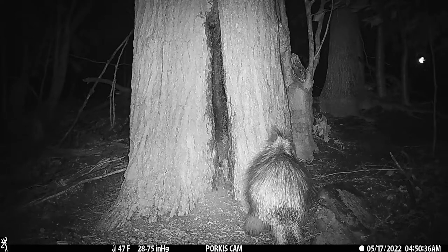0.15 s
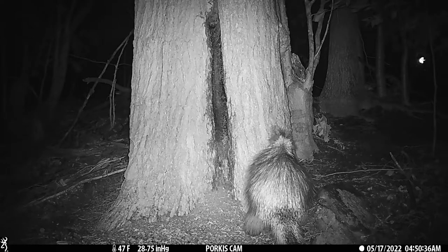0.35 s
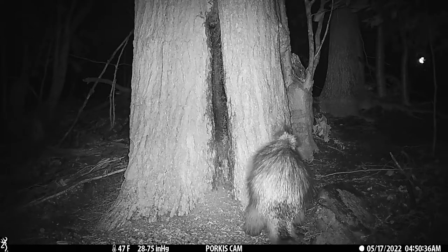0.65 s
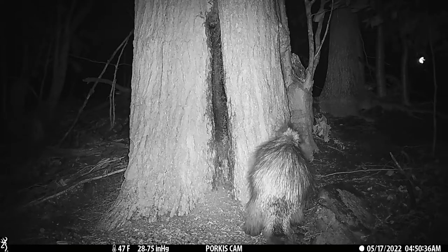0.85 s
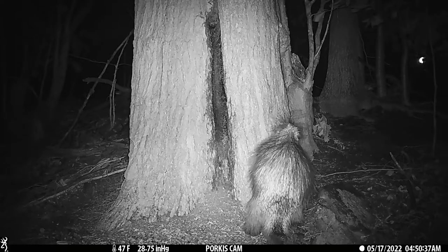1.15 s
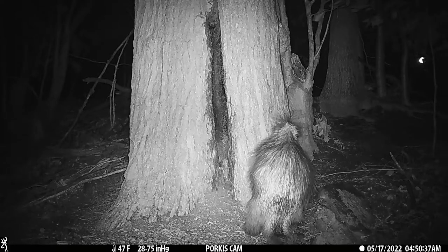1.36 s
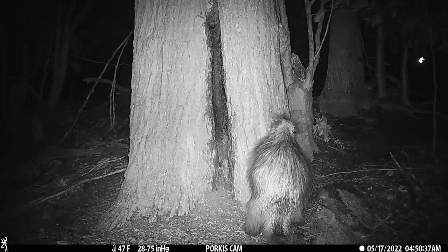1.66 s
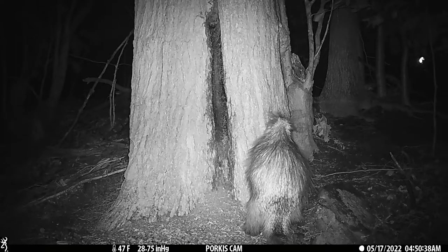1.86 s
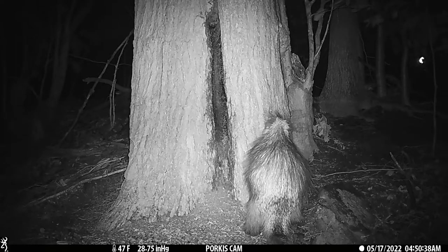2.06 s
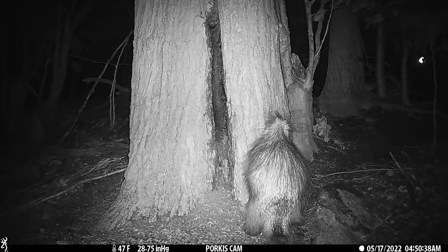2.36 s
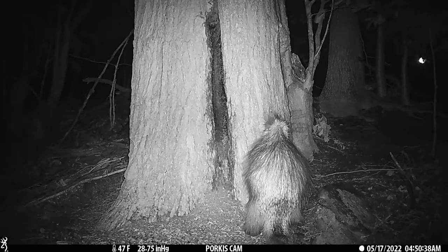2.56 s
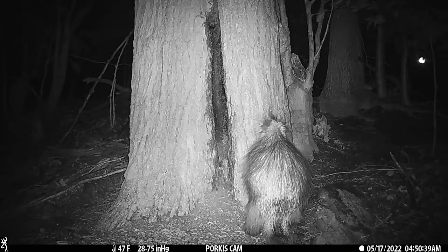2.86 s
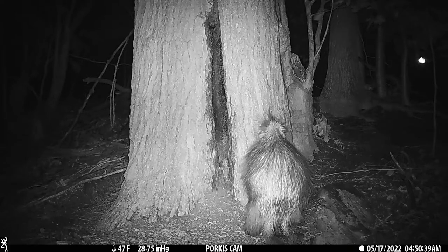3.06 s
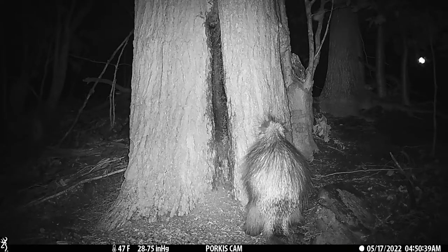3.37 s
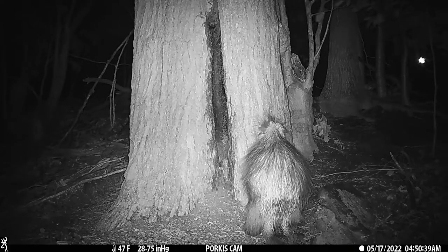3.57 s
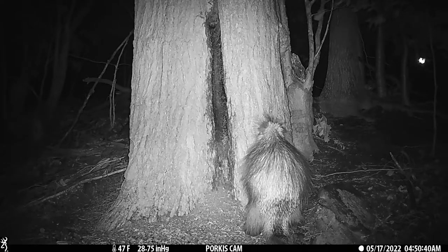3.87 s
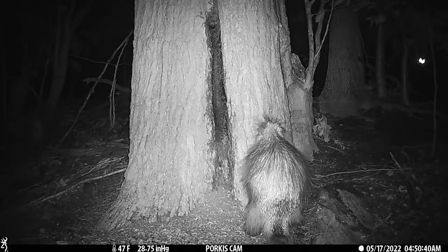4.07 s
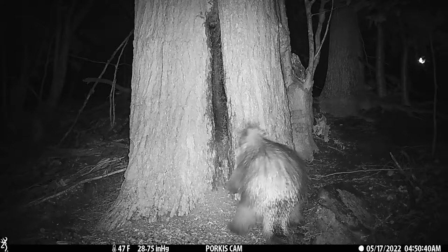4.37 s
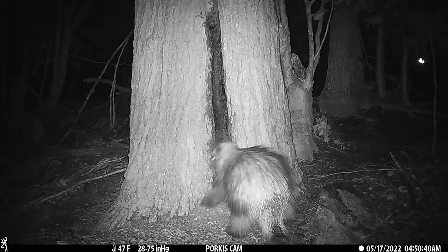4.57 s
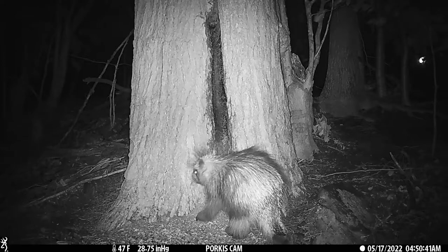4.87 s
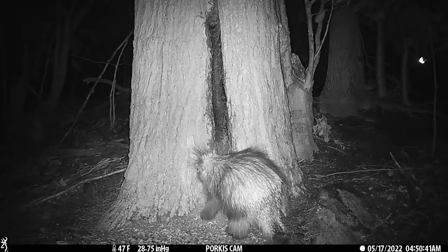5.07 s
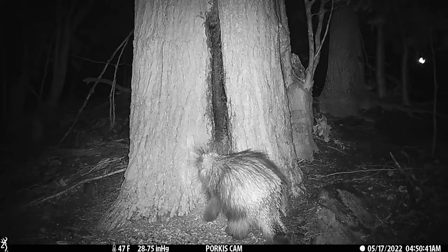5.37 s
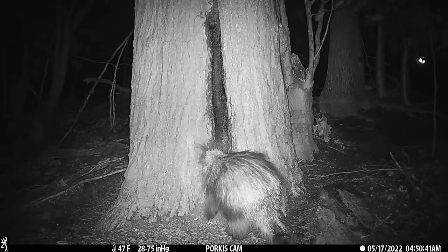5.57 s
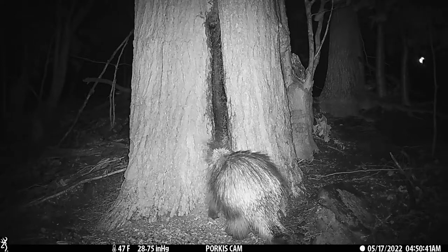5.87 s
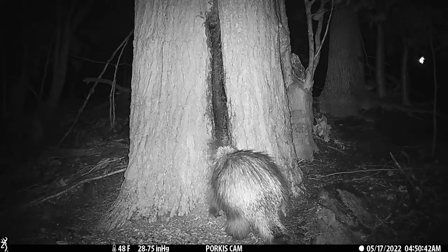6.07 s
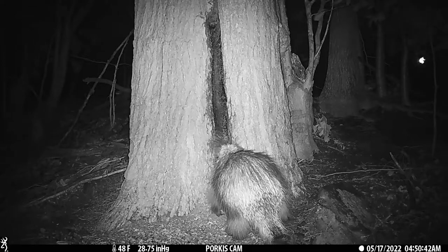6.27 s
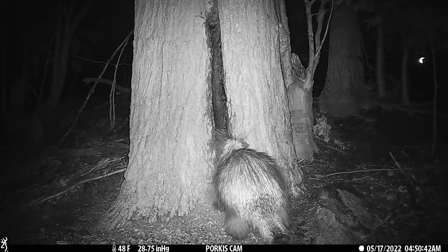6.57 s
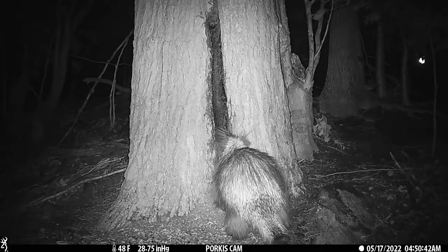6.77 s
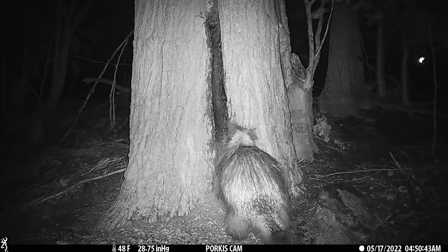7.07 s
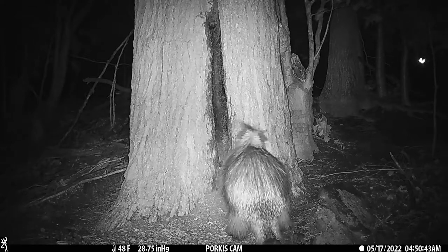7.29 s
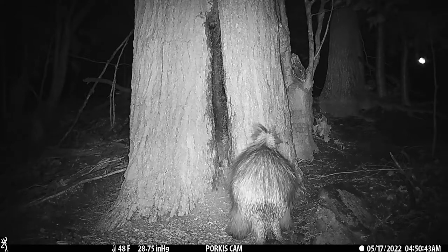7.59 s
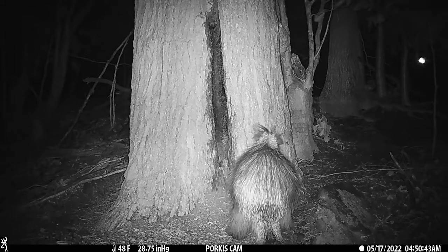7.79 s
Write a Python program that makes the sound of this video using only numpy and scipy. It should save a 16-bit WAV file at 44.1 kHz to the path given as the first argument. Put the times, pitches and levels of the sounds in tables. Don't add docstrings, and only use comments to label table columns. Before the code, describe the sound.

A porcupine close to a fixed microphone whines in a night forest. The tail of a falling cry opens the sound, ending by 0.1 s. Short nasal cries follow at about 0.6, 1.5, 2.4, 3.2, 4.4, 5.2, 6.2 and 7.15 s, each lasting roughly 0.35 to 0.55 s. They jump to a high clear pitch, swell, then drop quickly and turn raspy; those at 0.6, 3.2 and 5.2 s catch on a lower step. The one at 6.2 s stays high longest before a short fall; the last is highest and loudest. Faint scattered echoes linger among the trunks. Leaf hiss runs throughout, with a quiet wavering electronic whine and a rapid beep pulsing about twenty times a second. Wind is slight at first, grows after 3.5 s, rumbles from 5 s, and thumps the microphone at 7.2 to 7.5 s.

```python
import sys
import numpy as np
from scipy import signal
from scipy.fft import rfft, irfft, next_fast_len
from scipy.io import wavfile
from scipy.ndimage import uniform_filter1d

SR = 44100
rng = np.random.default_rng(int(sys.argv[2]) if len(sys.argv) > 2 else 0)


def volts_from_decibels(level):
    exponent = np.asarray(level, float) / 20
    return 10 ** exponent


def store_pcm(level_fs):
    pcm = np.round(np.clip(level_fs, -1, 1) * 32767).astype(np.int16)
    wavfile.write(sys.argv[1], SR, np.atleast_2d(pcm).T)


N = 349713


def evened(x):
    return x / np.sqrt(np.mean(x ** 2) + 1e-20)


def read(points, hz):
    f, value = np.transpose(points)
    return np.interp(np.log(hz + 1), np.log(f + 1), value)


def curve(rows):
    s, value = np.transpose(rows)
    return np.interp(np.arange(N) / SR, s, value)


def wander(hz, size=N, count=1):
    length = next_fast_len(size)
    f = np.fft.rfftfreq(length, 1 / SR)
    f = f[f < 6 * hz]
    z = rng.standard_normal((count, len(f), 2)) @ [1, 1j]
    z = z / (1 + (f / hz) ** 4) * (f > 0)
    return np.squeeze(evened(irfft(z, length)[:, :size]))


def add(mix, s, sound):
    part = mix[round(s * SR):][:len(sound)]
    part += sound[:len(part)]


# t/s, strength (0-1)
WIND = [(0.0, 0), (0.7, 0), (1.5, 0.09), (2.5, 0.22), (3.7, 0.55), (4.6, 0.62), (5.3, 0.83), (6.4, 0.94),
        (6.8, 0.82), (7.35, 0.96), (7.93, 0.9)]
# f/Hz, level per Hz/dB
HISS_SPECTRUM = [(20, -6), (150, -8), (400, -2.5), (900, 1), (1600, -1.5), (3000, -1.5), (5000, 0.5),
                 (5350, -2.5), (5700, -7), (7000, -13), (8500, -16.5), (10300, -23.5), (11500, -27.5),
                 (16000, -48)]


def hiss(patchy_db=1.33):
    calm_db, rise_db = -62, 4.5
    frames, hz = N // 256 + 5, np.fft.rfftfreq(1024, 1 / SR)
    a, b, patches = rng.standard_normal((frames, 513, 3)).T
    patches = uniform_filter1d(patches, size=12, axis=0)
    patches = evened(uniform_filter1d(patches, size=14, axis=1))
    z = (a + 1j * b) * volts_from_decibels(read(HISS_SPECTRUM, hz)[:, None] + patchy_db * patches)
    noise = signal.istft(z, nperseg=1024, noverlap=768)[1][:N]
    return volts_from_decibels(calm_db + 2.0 + rise_db * curve(WIND)) * evened(noise)


# t/s, peak level/dB
GUSTS = [(0.11, -62.5), (0.44, -68), (0.64, -70), (1.95, -75), (2.21, -72), (2.92, -66), (3.75, -74.5),
         (4.06, -70.5), (4.35, -73), (4.53, -68), (5.03, -63), (5.15, -58.5), (5.38, -66), (5.61, -58.5),
         (5.74, -56), (5.94, -57), (6.05, -61), (6.28, -56), (6.45, -62), (6.69, -59), (6.89, -59),
         (7.07, -52), (7.18, -57.5), (7.35, -56), (7.77, -53)]
# t/s, peak level/dB, centre f/Hz
PUFFS = [(5.938, -51, 60.8), (6.873, -55.5, 85), (7.062, -55, 43.1), (7.186, -48.5, 161), (7.199, -48, 145),
         (7.214, -50, 129), (7.289, -50, 70.5), (7.332, -37.5, 173), (7.351, -43, 129), (7.403, -41, 335),
         (7.418, -40.5, 240), (7.497, -49.5, 88.8), (7.519, -51, 40.4)]


def breeze(lumpy_db=2.5, top_hz=95):
    calm_db, rise_db, bend = -84.5, 23.5, 3
    flank_db_per_s = 270
    push = signal.sosfilt(signal.butter(1, 12, "high", fs=SR, output="sos"), wander(top_hz))
    t = np.arange(N) / SR
    level_db = calm_db + rise_db * np.maximum(curve(WIND), 0) ** bend
    for s, db in GUSTS:
        level_db = np.maximum(level_db, db - flank_db_per_s * abs(t - s))
    out = volts_from_decibels(level_db - 2) * evened(push * volts_from_decibels(lumpy_db * wander(25)))
    for s, db, hz in PUFFS:
        u = np.arange(-3, 3, 4.5 * hz / SR)
        swing = (1 - 1.3 * u ** 2 + .5 * u) * np.exp(-u ** 2)
        add(out, s - .11 / hz, -volts_from_decibels(db) * swing)
    return out


# t/s, f/Hz
WHINE_DRIFT = [(0.0, 3771), (0.3, 3819.5), (0.7, 3787.5), (1.5, 3680), (1.9, 3715.5), (2.28, 3590),
               (2.5, 3679), (2.65, 3519), (2.9, 3659.5), (3.1, 3640), (3.4, 3789), (3.9, 3661), (4.8, 3642),
               (5.25, 3900), (5.9, 3799.5), (6.35, 3899.5), (6.85, 3700), (7.93, 3870.5)]
# multiple, level/dB
WHINE_ORDERS = [(1, -59.5), (2, -68.5), (4, -92)]


def camera(duty=0.06):
    beep_hz, beep_db, beeps_per_s, beep_start_s = 2513, -61.5, 19.98, 0.0408
    circuit_db = -73.5
    whine_hz = curve(WHINE_DRIFT) + 30 * wander(5) + 42 * wander(35) + 45 * wander(220)
    turns = np.cumsum(whine_hz) / SR
    whine = sum(volts_from_decibels(db + 3 + 1.5 * wander(120)) * np.cos(2 * np.pi * k * turns)
                for k, db in WHINE_ORDERS)
    clock = 2 * np.pi * beeps_per_s * (np.arange(N) / SR - beep_start_s)
    gate = np.clip(3.0 * (np.cos(clock) + duty) + .5, 0, 1)
    slide_hz = (38 + 40 * wander(9)) * np.sin(clock)
    beep = np.cos(2 * np.pi * np.cumsum(beep_hz + slide_hz + 22 * wander(10)) / SR)
    beep = volts_from_decibels(beep_db + 1.9 * wander(31)) * gate * beep
    return whine + beep + volts_from_decibels(circuit_db) * rng.standard_normal(N)


# f/Hz, t60/s
WOOD_DECAY = [(300, 0.21), (1000, 0.84), (1600, 0.21), (3000, 0.4), (5000, 0.38), (8000, 0.32),
              (14000, 0.31)]
# f/Hz, level/dB
SCATTER = [(300, -12), (1000, -10), (1600, -5), (2400, -5), (3600, 0), (6000, 0), (12000, -2)]


def wood(x):
    taps = np.zeros(SR)
    at = np.arange(300, SR - 20, 20)
    taps[at + rng.integers(0, 20, len(at))] = rng.choice([-1., 1.], len(at))
    hz, t, z = signal.stft(taps, SR, nperseg=256)
    t60 = np.maximum(read(WOOD_DECAY, hz), .05)[:, None]
    decay_db = read(SCATTER, hz)[:, None] - 60 * t / t60
    tail = signal.istft(z * volts_from_decibels(decay_db), SR, nperseg=256)[1]
    return signal.fftconvolve(x, tail / np.linalg.norm(tail) * 0.79)[:N]


# f/Hz, width/Hz, level/dB
THROAT = [(336, 1100, -19), (1160, 47, -18), (1547, 380, 7.5), (2270, 730, -8), (3460, 660, 0),
          (4010, 920, -5.5), (4880, 660, -4), (5666, 950, -7.5), (9030, 940, -29)]
# f/Hz, width/Hz, depth/dB
NOSE = (1190, 130, 7)
# f/Hz, width/Hz, depth/dB
VALLEY = (2600, 380, 3.5)


def throat_gain(hz):
    grid = np.arange(0, SR / 2, 10)
    power = sum(volts_from_decibels(2 * db) / (1 + (2 * (grid - f) / w) ** 2) ** 1.884 for f, w, db in THROAT)
    dips_db = sum(db * np.exp(-((grid - f) / w) ** 2) for f, w, db in (NOSE, VALLEY))
    return np.interp(hz, grid, np.sqrt(power) * volts_from_decibels(-dips_db))


def effort(t, hz, top_s, top_db, swell_db, bend, fade_db_per_s):
    onset_s, onset_db, release_s, release_db = 0.027, 7.5, 0.028, 18
    ahead = np.clip((top_s - t) / (top_s - t[0]), 0, 1)
    onset = onset_db * np.clip(1 - (t - t[0]) / onset_s, 0, 1) * (t[0] > .01)
    release = release_db * np.clip(1 - (t[-1] - t) / release_s, 0, 1)
    crossing_db = 3 * np.exp(-((hz - 780) / 66) ** 2)
    fade_db = fade_db_per_s * np.maximum(t - top_s, 0)
    return top_db - swell_db * ahead ** bend - fade_db - (onset + release) + crossing_db


def cry(pitch, push, head_db, tight, loose, hoarse, jitter=0.0028, breath=0.03):
    s, hz = np.transpose(pitch)
    starts_silent = s[0] > .01
    t = np.arange(s[0], s[-1] + 0.006, 1 / SR)
    hz = uniform_filter1d(np.interp(t, s, hz), size=500, mode="nearest")
    hz = uniform_filter1d(hz, size=400, mode="nearest")
    turns = np.cumsum(hz * (1 + jitter * wander(99, size=len(t)))) / SR
    k = np.arange(1, 30)[:, None]

    slack = np.clip((875 * tight - hz) / 220, 0, 1)
    mouth = tight + (loose - tight) * slack
    level_db = uniform_filter1d(effort(t, hz / mouth, *push), size=500, mode="nearest")
    bright = 2.9 - 0.36 * (level_db.max() - level_db) - 2.5 * slack
    drop = np.clip(-np.gradient(np.log(hz)) * SR / 4, 0, 1)
    level_db = level_db - 2 * uniform_filter1d(slack * np.clip(1 - 2 * drop, 0, 1), size=600)
    rough = min(hoarse, 1) * (.28 * slack + .55 * drop) * np.clip((k * hz - 1300) / 1500, 0, 1)

    air = 1 / (1 + (k * hz / 10700) ** 12)
    heights = throat_gain(k * hz / mouth) * volts_from_decibels(bright * np.log2(k * hz / 2500)) * air
    turned_db = (np.minimum(k, 6) == [1, 3, 4, 5, 6]) @ np.array(head_db)[:, None]
    heights = heights * volts_from_decibels(turned_db * (1 - .6 * slack))
    shut = np.clip(1 - (t - s[0]) / 0.075, 0, 1) ** .5
    heights = heights * volts_from_decibels(-11 * (k > 2) * starts_silent * shut)
    heights = heights / np.sqrt((heights ** 2).sum(0) / 2)

    size, count = len(t), len(k)
    flutter = volts_from_decibels(np.clip(abs(k - 2.2) + .3, 0, 2.8) * wander(16, size, count))
    rasp = (wander(190, size, count) + 1j * wander(190, size, count)) / np.sqrt(2)
    shape = np.sqrt(1 - rough ** 2) * flutter + (rough + breath) * rasp
    phase = np.exp(2j * np.pi * (k * turns + rng.random(k.shape)))
    voice = (heights * shape * phase).real.sum(0)
    rise = (t + (not starts_silent) - s[0]) / 0.0027
    edge = np.clip(np.minimum(rise, (t[-1] - t) / 0.013), 0, 1)
    return s[0], volts_from_decibels(level_db) * voice * edge


# t/s, f/Hz
SWEPT = [
    [(0.0, 875), (0.014, 845), (0.044, 702), (0.092, 409.4), (0.11, 321)],
    [(1.515, 780), (1.54, 905), (1.575, 991), (1.75, 883.6), (1.786, 760), (1.822, 522.5), (1.862, 434)],
    [(2.355, 832.6), (2.402, 1020), (2.538, 1038), (2.63, 988), (2.668, 737.6), (2.7, 475), (2.755, 337)],
    [(4.362, 953), (4.39, 1048), (4.54, 995), (4.616, 878), (4.65, 699.1), (4.682, 433), (4.715, 336)],
    [(6.2, 834), (6.246, 978), (6.302, 997), (6.42, 952), (6.502, 972.5), (6.54, 924), (6.57, 856),
     (6.588, 725), (6.6, 650)],
    [(7.15, 807), (7.202, 1043), (7.252, 1093), (7.36, 1115), (7.43, 1086), (7.492, 981), (7.546, 780),
     (7.572, 646), (7.605, 476)],
]
# t/s, f/Hz
STALLED = [
    [(0.605, 758), (0.64, 944), (0.68, 979), (0.79, 848), (0.827, 688.3), (0.85, 558.6), (0.89, 549.6),
     (0.925, 449), (0.965, 273.5)],
    [(3.24, 934), (3.29, 1063), (3.44, 1070), (3.535, 891), (3.574, 721), (3.602, 503), (3.63, 406),
     (3.69, 424.6), (3.78, 318)],
    [(5.222, 797), (5.255, 945), (5.336, 917), (5.42, 817), (5.444, 780), (5.486, 659), (5.532, 686),
     (5.624, 510), (5.665, 431)],
]
# loudest t/s, level/dB, swell from the start/dB, bend of the swell, fade/(dB/s)
EFFORT = [
    (0.02, -38, 2, 0.86, 72),
    (1.76, -40, 17, 1.3, -8),
    (2.641, -35.5, 19, 1.26, 52),
    (4.62, -37, 10, 1.35, 40.5),
    (6.52, -37.5, 19, 1.38, 2),
    (7.47, -34, 25, 2.8, 28.5),
    (0.8, -39.5, 16, 1, 18),
    (3.53, -35, 16.5, 1.8, 29.5),
    (5.43, -40, 17, 1.4, 3.5),
]
# level/dB on overtones 1, 3, 4, 5, and 6 upward
HEAD = [(-1.1, -1, -2, .1, 1.1), (-1.5, -0.5, -4, -1.5, -0.28), (-1, 1, -2.5, -0.18, 0.72),
        (-1.1, 2, 1.3, 0.4, 1.4), (-5.5, 1.5, -3.5, 1.5, -0.0021), (-4.5, 2.5, 0.7, 0.112, 0.8),
        (-0.5, -3, -1.6, -1.5, 0.48), (-3, -1, -2, -0.051, -1.1), (-3, -3, -1.5, .1, 1.4)]
MOUTH = [(1, 1.036, .99), (1.03, 1.014, .99), (1.064, 1.044, .99), (1.018, 1.007, 0.86), (1.024, 0.96, 1),
         (1.052, 1.073, .99), (1.03, 1.03, 0.9), (1.06, 1.043, 0.74), (1.006, 1.02, 0.54)]


def porcupine():
    animal = np.zeros(N)
    for pitch, push, head_db, mouth in zip(SWEPT + STALLED, EFFORT, HEAD, MOUTH):
        add(animal, *cry(pitch, push, head_db, *mouth))
    return animal


def scene():
    animal = porcupine()
    voice = volts_from_decibels(-1.5) * animal + volts_from_decibels(-3.5) * wood(animal)
    return np.tile(voice + hiss() + breeze() + camera(), (2, 1))


# t/s, low f/Hz, high f/Hz
SIDE_FLICKERS = [(0.2, 5700, 6900), (0.34, 5700, 7500), (1.04, 5700, 7500), (1.2, 5700, 7500),
                 (1.39, 5700, 6900), (1.5, 5000, 6200), (1.62, 4600, 5700), (2.11, 7600, 9000),
                 (3.11, 4700, 5700), (2.25, 9600, 13000), (2.42, 13500, 15700), (3.09, 12500, 15700),
                 (3.74, 11500, 12500), (3.9, 9000, 10300), (5.01, 10300, 12500), (4.635, 4200, 5700),
                 (5.25, 5700, 7500), (6.49, 8300, 9600), (7.03, 7600, 9000), (7.68, 4700, 5700)]


def side_flickers(x):
    length_s, level_db = 0.036, -1.5
    block, block_start = 1024, 640
    side, size = np.zeros(N), round(length_s * SR)
    hz = np.fft.rfftfreq(size, 1 / SR)
    for s, low_hz, high_hz in SIDE_FLICKERS:
        centre = round((s * SR - block_start) / block) * block + block_start
        start = centre / SR - length_s / 2
        z = rfft(x[round(start * SR):][:size][::-1])
        band = irfft(z * (hz > low_hz) * (hz < high_hz), size)
        add(side, start, volts_from_decibels(level_db) * np.hanning(size) * band)
    return side * [[1], [-1]]


def top_cut(x):
    return signal.sosfilt(signal.butter(12, 15700, fs=SR, output="sos"), x)


# f/Hz, width/Hz, depth/dB
NOTCHES = [(5480, 75, 20), (5400, 200, 4), (11000, 300, 5), (13100, 500, 4), (15250, 450, 5)]


def record(dry):
    hz = np.fft.rfftfreq(N, 1 / SR)
    dips_db = sum(db * np.exp(-((hz - f) / w) ** 2) for f, w, db in NOTCHES)
    wired = irfft(rfft(dry) * volts_from_decibels(-dips_db), N)
    return top_cut(wired + side_flickers(wired[0]))


dry = scene()
out = record(dry)
store_pcm(out)
```